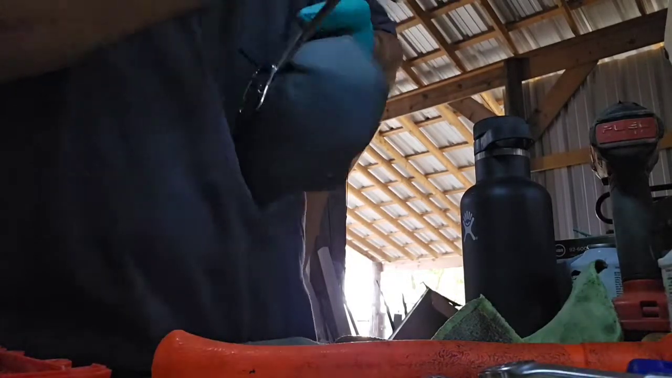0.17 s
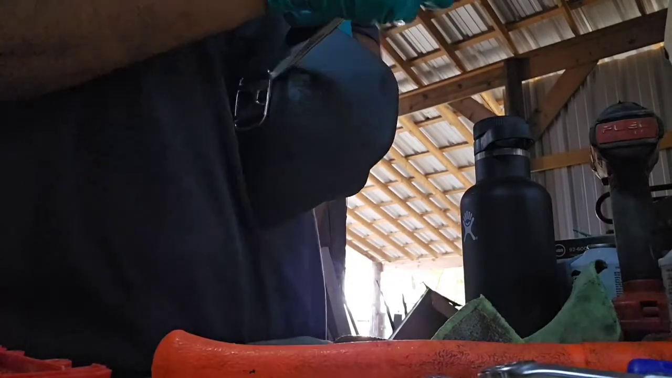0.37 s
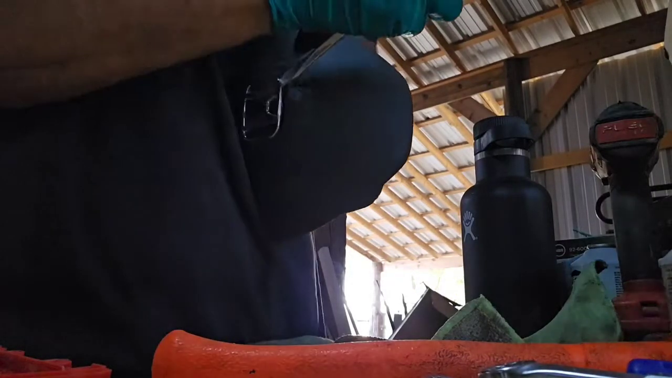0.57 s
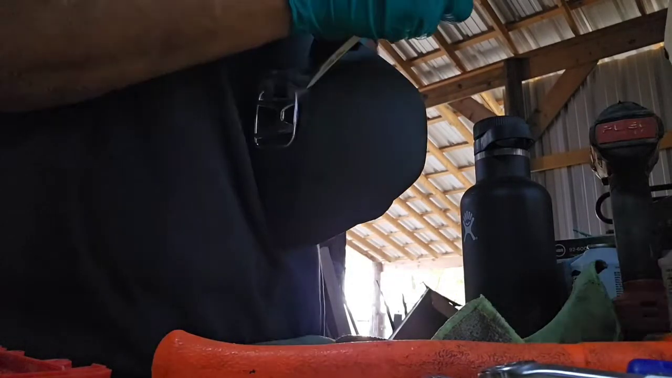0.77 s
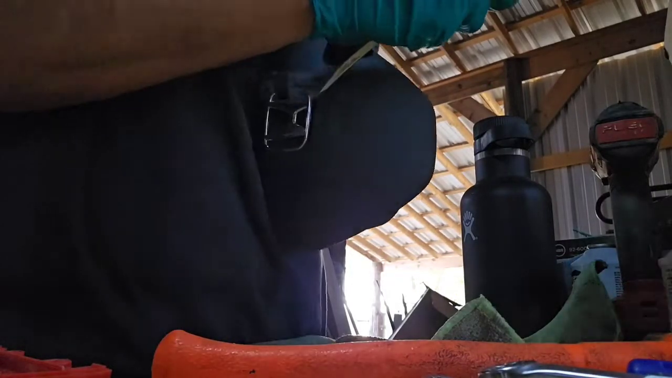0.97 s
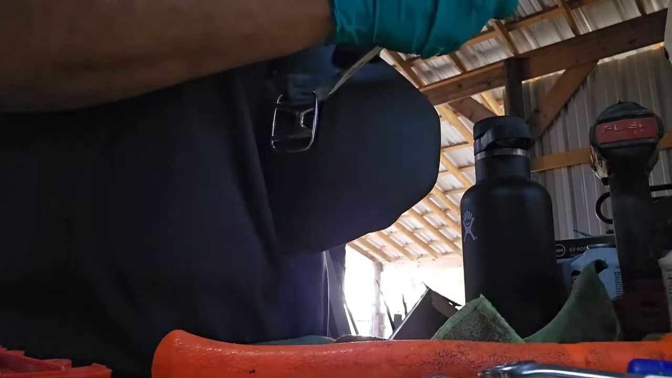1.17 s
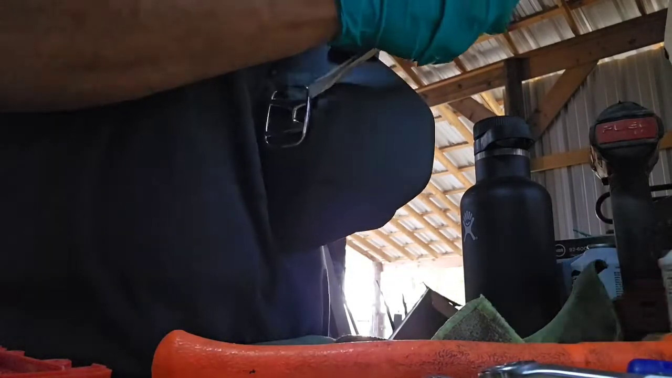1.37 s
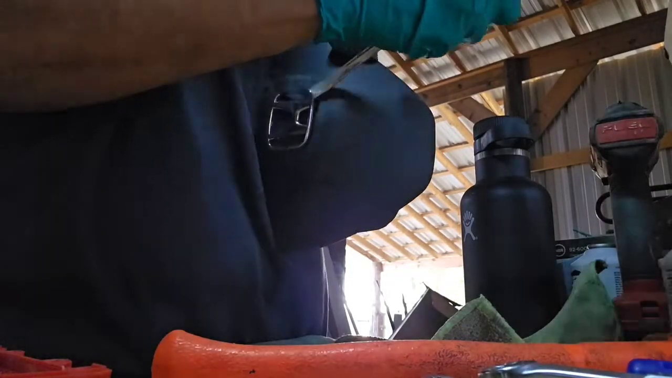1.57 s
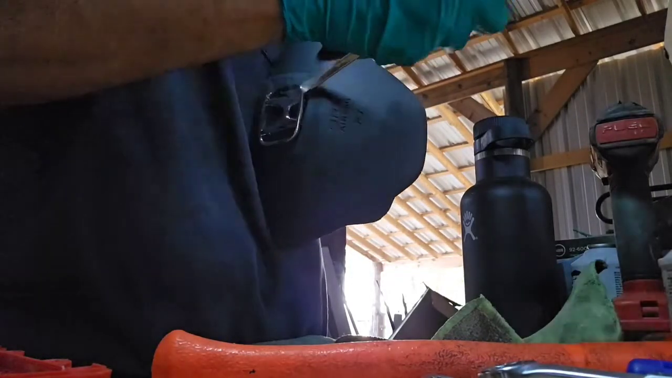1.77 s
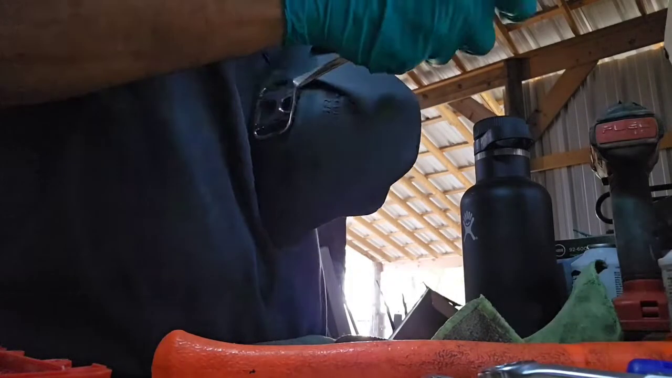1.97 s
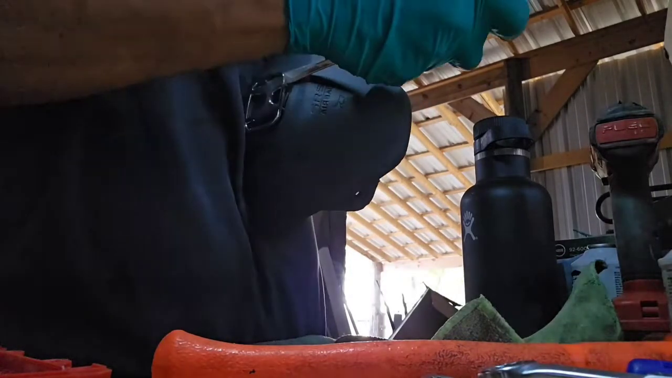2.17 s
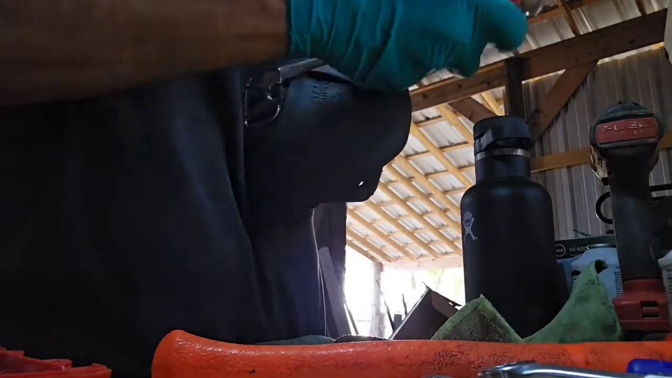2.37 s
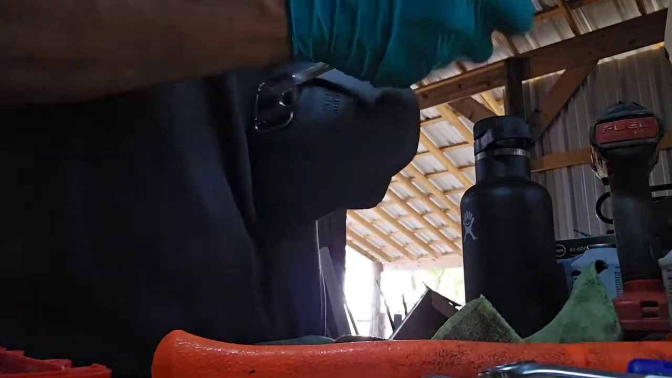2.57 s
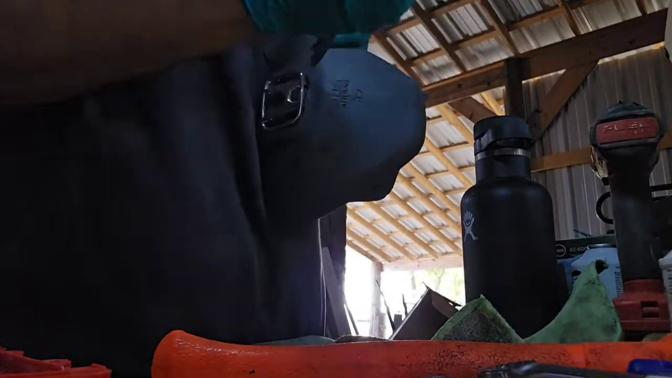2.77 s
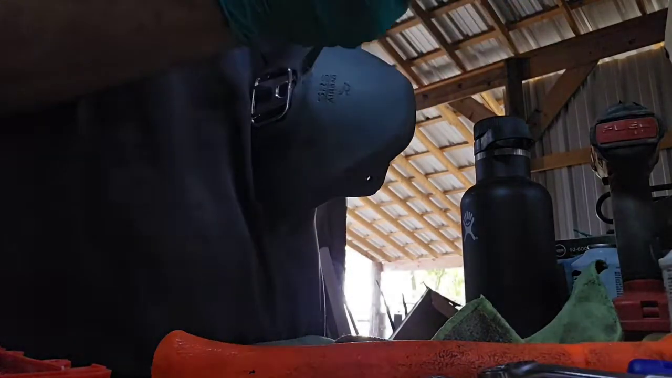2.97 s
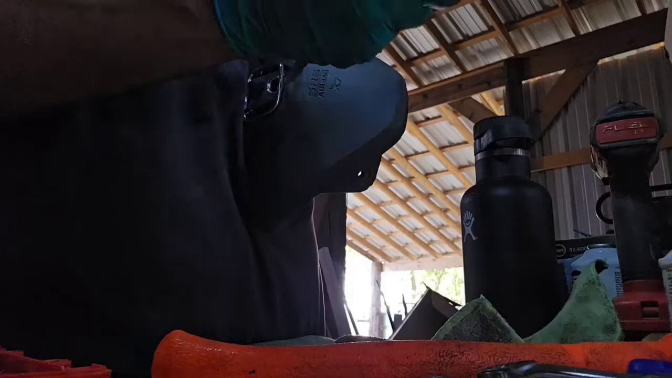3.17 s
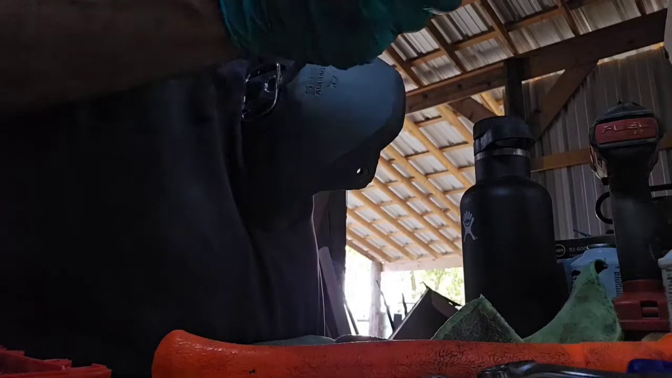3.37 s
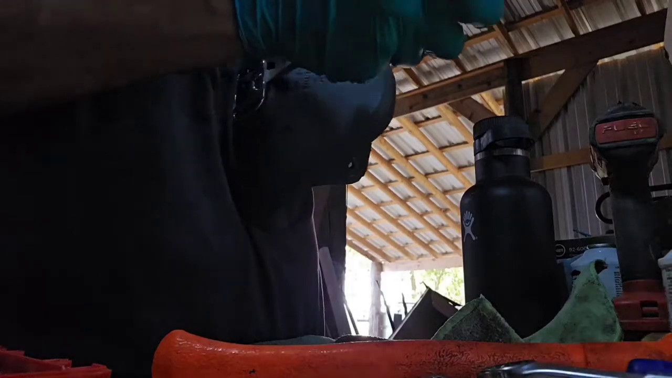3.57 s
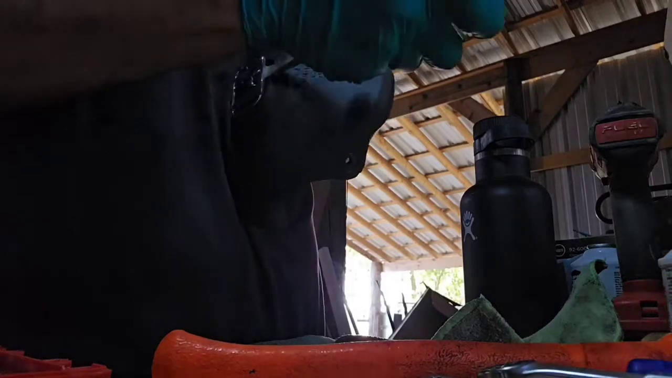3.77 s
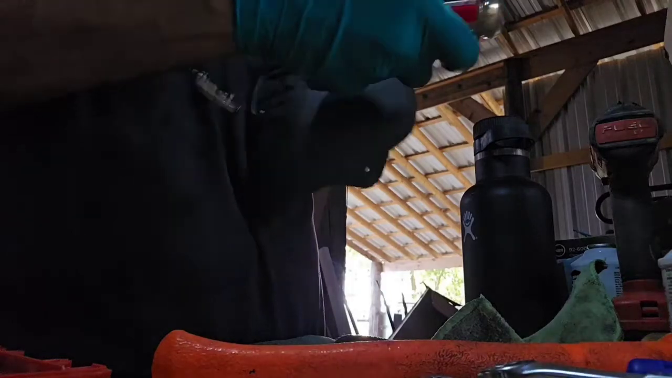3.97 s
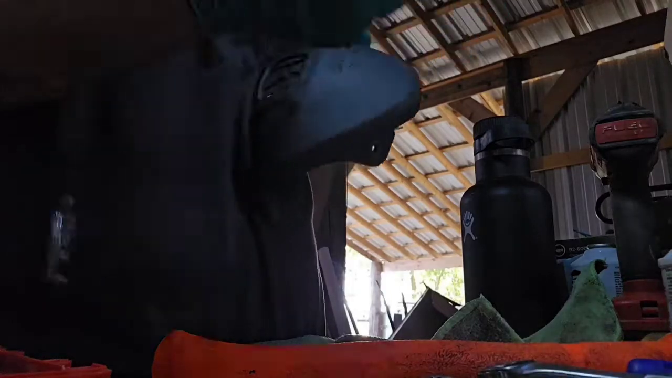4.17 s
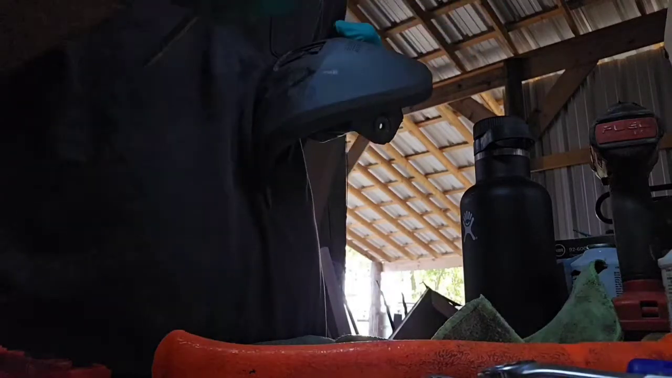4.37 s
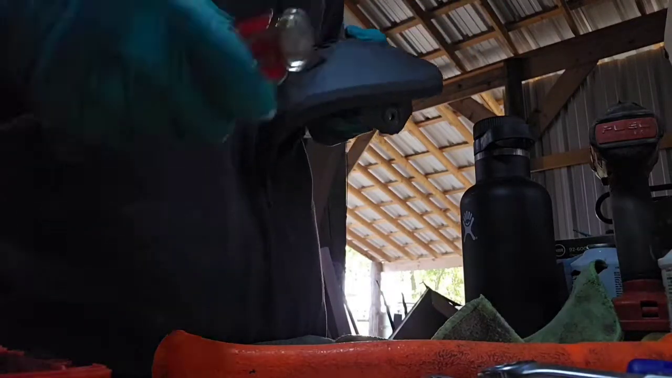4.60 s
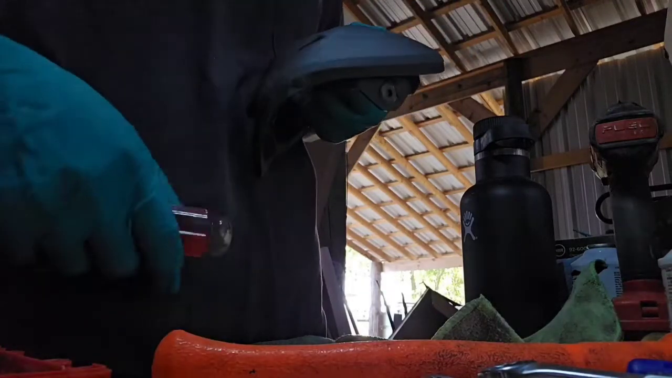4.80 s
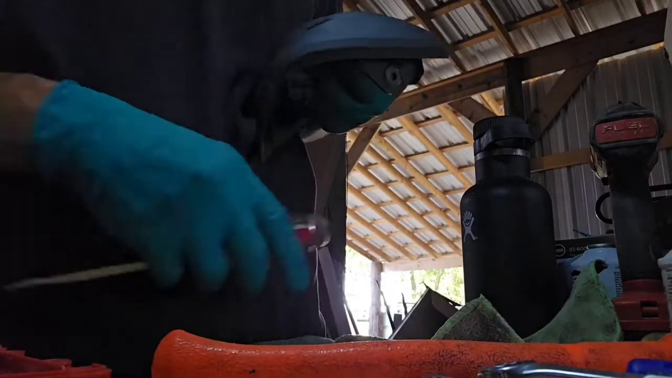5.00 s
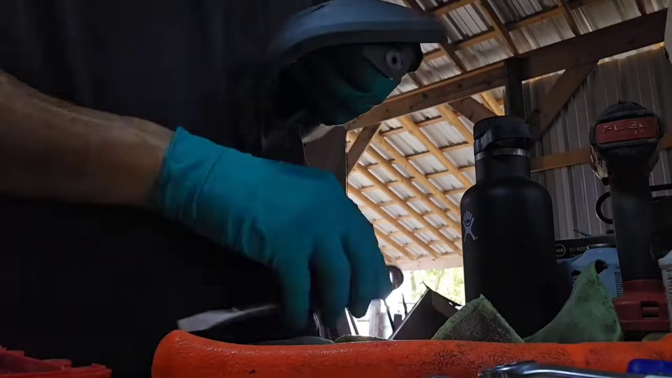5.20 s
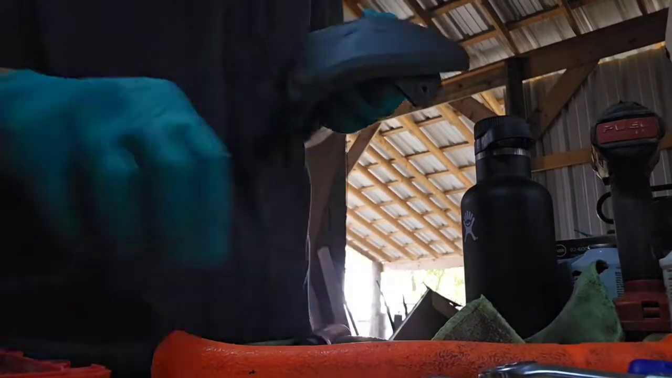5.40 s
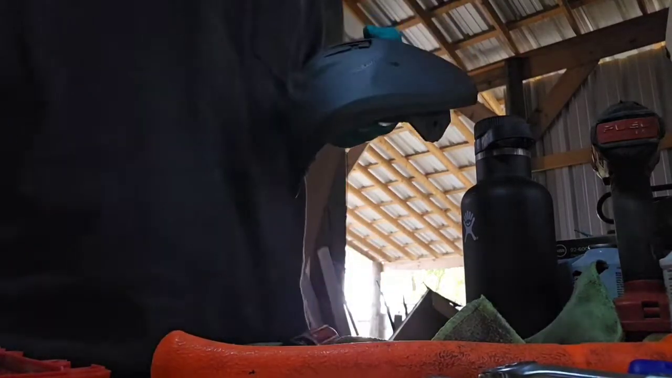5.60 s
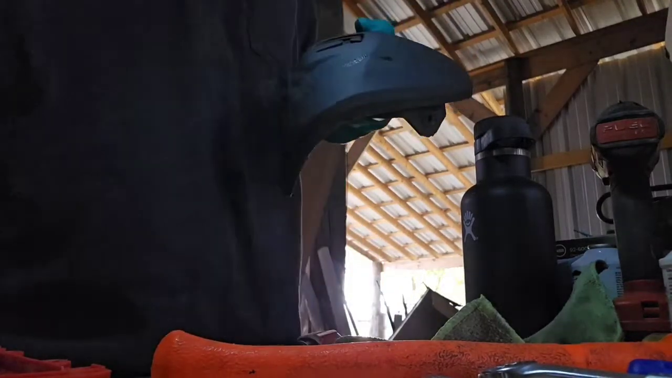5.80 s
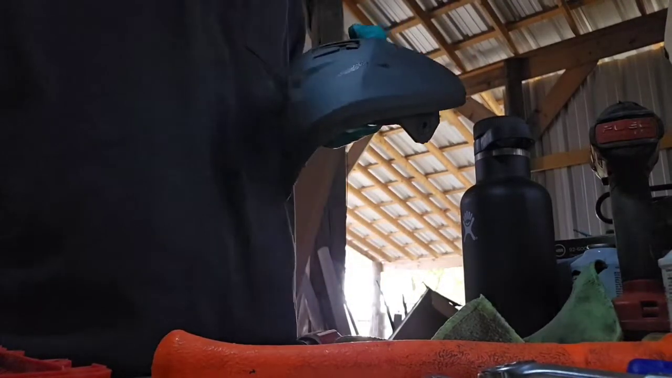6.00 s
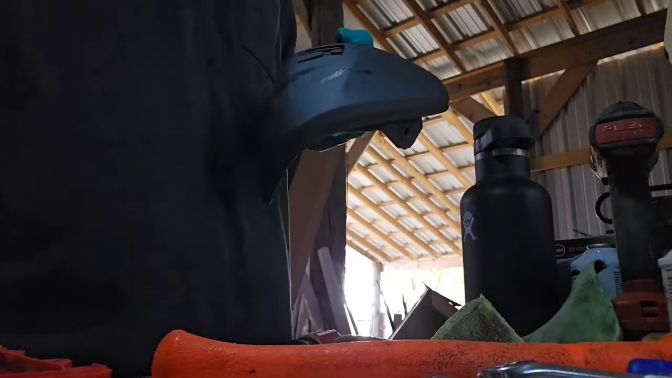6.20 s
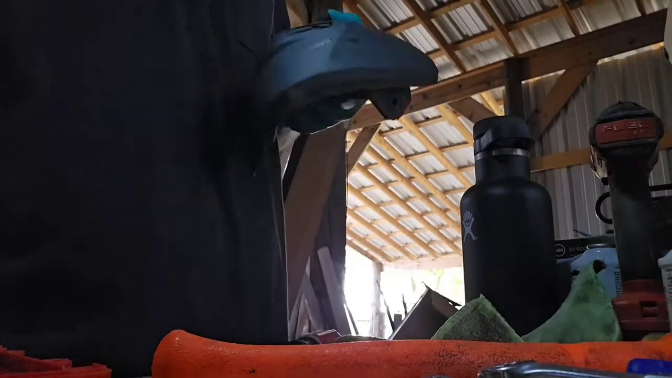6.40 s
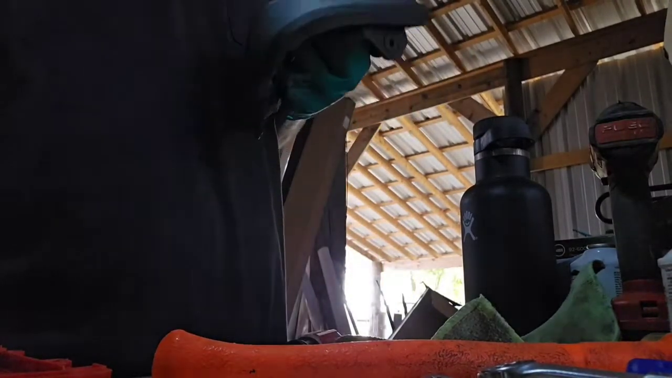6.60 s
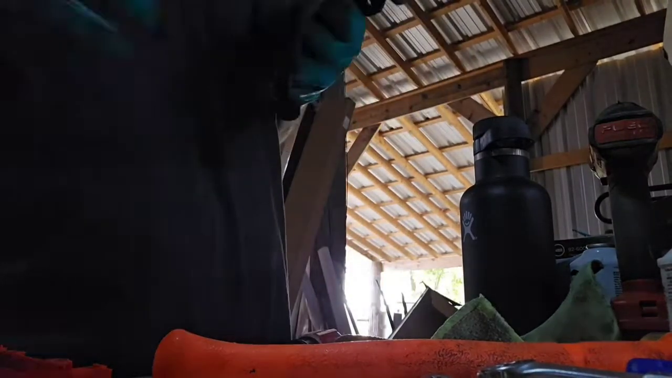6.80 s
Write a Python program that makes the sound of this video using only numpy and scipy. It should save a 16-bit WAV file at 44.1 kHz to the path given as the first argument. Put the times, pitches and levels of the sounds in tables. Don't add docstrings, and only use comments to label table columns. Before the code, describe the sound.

A stereo microphone sits on the bench, near the hands. Dry plastic clicks, short creaks and cloth rubbing come sparsely, with one strong snap around two seconds and a cluster of cracks near four. A hard little part then lands ringing on wood and chatters quieter. A heavy tool is set down with a dull double thump, followed by scratchy glove scuffs and a sharp tick. Thin cricket trills and soft outdoor rumble continue throughout.

```python
import sys
import numpy as np
from scipy import signal
from scipy.io import wavfile

SR = 44100
rng = np.random.default_rng(int(sys.argv[2]) if len(sys.argv) > 2 else 0)


def volts(x):
    e = np.asarray(x, float) / 20
    return 10 ** e


def transcribe(signal):
    frames = np.atleast_2d(signal).T
    limited = np.clip(frames, -1, 1)
    pcm = np.round(limited * 32767).astype(np.int16)
    wavfile.write(sys.argv[1], SR, pcm)


N = 302085


def rms_one(x):
    return x / np.sqrt(np.mean(x ** 2) + 1e-20)


def in_time(rows):
    s, *columns = np.transpose(rows)
    return [np.interp(np.arange(N) / SR, s, c) for c in columns]


def at_hz(points, hz):
    return np.interp(np.log(hz), np.log(np.array(points)[:, 0]), np.array(points)[:, 1])


def samples(events):
    s, *columns = np.transpose(events)
    return np.round(s * SR).astype(int), *columns


def drift(rate):
    r = np.exp(-2 * np.pi * rate * 40 / SR)
    white = rng.standard_normal(N // 40 + 2002)
    slow = signal.lfilter([1], [1, -2 * r, r * r], white)[2000:]
    return np.interp(np.arange(N) / 40, np.arange(len(slow)), rms_one(slow))


def ring(clicks, hz, t60, rise=0):
    r, w = volts(-60 / (t60 * SR)), 2 * np.pi * hz / SR
    out = signal.lfilter([0, np.sin(w)], [1, -2 * r * np.cos(w), r * r], clicks + 1e-18)
    if rise > 0:
        out = out - ring(clicks, hz, t60 * min(rise, 0.9))
    return out


def train(at, gains):
    return np.bincount(at, gains, N)[:N]


def ears(x, pan_db, lag):
    late = np.interp(np.arange(N) - lag, np.arange(N), x)
    return np.array([late * volts(pan_db / 2), x * volts(-pan_db / 2)])


def strike(at, level_db, tilt_db, modes, centre_hz, scatter_db, lag, beam, rise, damp=1, focus_db=0, sign=-1):
    out = 0
    chance = rng.standard_normal((len(at), len(modes)))
    aim = rng.standard_normal((len(modes), 2))
    for k, (hz, mode_db, t60) in enumerate(modes):
        octaves = np.log2(hz / centre_hz)
        gain_db = level_db + mode_db + tilt_db * octaves - focus_db * np.abs(octaves)
        gains = volts(gain_db + scatter_db * chance[:, k]) * sign ** k
        tone = ring(train(at, gains), hz, t60 * damp, rise)
        pan_db, skew = beam * min(hz / 3000, 1) * aim[k]
        out = out + ears(tone, pan_db, lag + skew)
    return out


def crack(at, level_db, t60, low_hz, alike):
    fall = signal.lfilter([1], [1, -volts(-60 / (t60 * SR))], train(at, volts(level_db)))
    fall = signal.lfilter([0.04], [1, -0.96], fall)
    high_pass = signal.butter(2, low_hz, "high", fs=SR, output="sos")
    mid, side = signal.sosfilt(high_pass, rng.standard_normal((2, N)))
    alike = np.clip(alike, 0, 1)
    return fall * (alike * mid + (1 - alike) * side * [[1], [-1]])


# (frequency [Hz], left-right likeness)
LIKENESS = [(60, 0.88), (180, 0.78), (550, 0.73), (1650, -0.41), (4970, 0.42), (15000, -1.3)]


def banded_noise(spectrum, patchy_db, speed):
    low, high = spectrum[0][0], min(spectrum[-1][0], 0.4 * SR)
    edges = np.geomspace(low, high, int(2.5 * np.log2(high / low)) + 2)
    out, together = 0, drift(speed)
    white = rng.standard_normal((2, 2, N))
    for k, band in enumerate(zip(edges, edges[1:])):
        band_pass = signal.butter(2, band, "band", fs=SR, output="sos")
        mid, side = signal.sosfilt(band_pass, white[k % 2])
        hz = np.sqrt(band[0] * band[1])
        alike = np.clip(at_hz(LIKENESS, hz), -1, 1)
        gain = volts(at_hz(spectrum, hz) + patchy_db * (together + drift(speed) / 2))
        out = out + gain * (np.sqrt(1 + alike) * mid + np.sqrt(1 - alike) * side * [[1], [-1]])
    return rms_one(out)


# (frequency [Hz], density [dB per Hz])
AIR = [(12, -62.5), (20, -22.5), (75, -7.5), (140, -27.5), (245, -21), (362, -33), (570, -27), (1190, -42),
       (2530, -46.5), (3500, -37), (4550, -52), (7700, -120)]
# (frequency [Hz], density [dB per Hz])
HISS = [(4500, -13), (6500, -11.5), (10200, -21), (11500, -21)]


def air():
    rumble = volts(-65.5) * banded_noise(AIR, patchy_db=3.06, speed=3.2)
    return rumble + volts(-87.5) * banded_noise(HISS, patchy_db=4.0, speed=2.2)


# ((pitch [Hz], wing strokes [per s], chirp length [s]), chirps (time [s], level [dB]))
CRICKETS = [
    ((4160, 58, .21), [(0.13, -74.5), (0.62, -79), (1.11, -72), (1.6, -70), (2.03, -68), (2.45, -67.5), (3.01, -80), (3.22, -81), (3.52, -76), (4.68, -83), (5.05, -76), (6.17, -71), (6.65, -81)]),
    ((4400, 54, 0.24), [(0.5, -80.5), (0.76, -68.5), (1.56, -69.5), (2.29, -73.5), (3.44, -68), (5.06, -72), (6.18, -78), (6.62, -81)]),
    ((4670, 52, 0.2), [(0.0, -68.5), (0.37, -72), (1.11, -71), (1.45, -68), (1.83, -66.5), (2.42, -64.5), (2.96, -74.5), (3.57, -72.5), (4.87, -77.5), (5.44, -71.5), (6.0, -79.5), (6.38, -67.5), (6.78, -80.5)]),
]


def crickets():
    out, t = 0, np.arange(N) / SR
    for (hz, per_s, length_s), chirps in CRICKETS:
        swell = np.full(N, volts(-84))
        for s, level_db in chirps:
            share = np.clip((t - s) / length_s, 0, 1)
            shape = np.abs(np.sin(np.pi * share ** 1.2)) ** 0.31
            swell = swell + volts(level_db + 3.0) * shape * (share < 1)
        stroke_hz = per_s * (1 + 0.31 * drift(29.0))
        stroke = 1 + 0.16 * np.sin(2 * np.pi * np.cumsum(stroke_hz) / SR)
        pitch = hz + 15 * drift(6.9)
        phase = np.array([2 * np.pi * np.cumsum(pitch + 45 * drift(50)) / SR for port in range(2)])
        note = np.sin(phase) + volts(-20) * np.sin(3 * phase)
        out = out + swell * stroke * note * volts([1.6 * drift(25), 6.3 * drift(25)])
    return out


# (time [s], hold
# [s], cloth level [dB], dull rubbing level [dB])
RUSTLE = [(0.001, 0.23, -65, -59.5), (0.333, 0.33, -87.5, -56), (0.91, 0.078, -84.5, -65),
          (1.58, 0.59, -81.5, -77), (2.176, 0.019, -70, -45.5), (2.586, 0.013, -72, -55.5),
          (3.214, 0.31, -93, -61), (4.01, 0.16, -66.5, -60), (4.403, 0.16, -61.5, -51),
          (4.624, .08, -61, -57.5), (4.712, 0.12, -75, -55.5), (5.257, .03, -68.5, -54),
          (5.366, 0.025, -72, -47), (5.757, 0.052, -63.5, -51.5), (6.045, .16, -67, -62),
          (6.447, 0.24, -74.5, -74)]


def gestures():
    rise_db_per_s, fall_db_per_s = 120.5, 87
    t = np.arange(0, N + 64, 64) / SR
    level_db = np.array([[-87], [-83.5]])
    for s, hold_s, *peak_db in RUSTLE:
        before_s = np.maximum(s - t, 0)
        after_s = np.maximum(t - s - abs(hold_s), 0)
        loss_db = rise_db_per_s * before_s + fall_db_per_s * after_s
        level_db = np.maximum(level_db, np.array(peak_db)[:, None] - loss_db)
    return [np.interp(np.arange(N) / SR, t, row) for row in level_db]


# (frequency [Hz], density [dB per Hz])
RUB = [(100, 1.5), (200, 1), (500, -4.5), (850, -2), (1050, -27.5), (1400, -10.5), (2500, -17.5),
       (4000, -27)]


def rubbing(rub_db):
    return volts(rub_db - 5.0) * banded_noise(RUB, patchy_db=4.0, speed=33)


# (frequency [Hz], density [dB per Hz])
CLOTH = [(900, -19.5), (1330, -7), (2560, -4.5), (4770, -7), (7500, -11.5), (10200, -24), (11500, -30)]


def rustle(cloth_db):
    cloth = volts(cloth_db + 3.0) * banded_noise(CLOTH, patchy_db=4.0, speed=8.3)
    on_cover = np.arange(N) < 4 * SR
    stroking = cloth * volts(0.6 * (cloth_db - cloth_db[0])) * on_cover
    hum = sum(ring(stroking, hz, 0.87 * t60) for hz, db, t60 in COVER[:4])
    high_pass = signal.butter(8, 10900, "high", fs=SR, output="sos")
    sheen = rms_one(signal.sosfilt(high_pass, rng.standard_normal((2, N))))
    sheen = (volts(cloth_db - 3.5) + volts(-85.5)) * volts(1.5 * drift(20)) * sheen
    return cloth + volts(-23.0) * hum + sheen


# (time [s], peak level [dB], bench level [dB])
DRAG = [(5.5493, -44, -68), (5.6238, -48, -63), (5.697, -47, -63), (5.7069, -37, -53.5), (5.7364, -46, -68),
        (5.7526, -46.5, -60), (5.759, -45.5, -65), (5.785, -38.5, -44), (5.7915, -32.5, -41),
        (5.8012, -33, -41), (5.811, -50, -40), (5.826, -38, -52), (5.8365, -39, -35.5), (5.847, -36.5, -39),
        (5.852, -41, -38), (5.8816, -49, -62), (5.926, -44, -46), (5.937, -41, -55), (5.943, -49, -52),
        (5.981, -49, -54.5), (6, -38, -70), (6.007, -60, -62), (6.045, -50, -59), (6.053, -46, -51.5),
        (6.1003, -46, -54), (6.107, -45.5, -61), (6.144, -49, -56), (6.1355, -66, -43), (6.192, -48.5, -71),
        (6.2472, -47, -60), (6.338, -42, -56.5), (6.348, -41.5, -58), (6.4453, -47, -79),
        (6.4654, -46.5, -78), (6.6864, -51.5, -82)]


def drag():
    at, level_db, bench_db = samples(DRAG)
    tilt_db = -3 + 0.36 * (level_db - bench_db)
    scuff_s, catches = 0.0063, 8
    delay = rng.random((len(at), catches)) * scuff_s * SR
    at = (at[:, None] + delay).astype(int).ravel()
    level_db, bench_db, tilt_db = np.repeat([level_db, bench_db, tilt_db], catches, axis=1)
    chatter = strike(at, level_db - 9.0, tilt_db, BADGE, 5800, scatter_db=4.5,
                     lag=3.45, beam=3.0, rise=0.062, damp=0.129)
    plastic = strike(at, level_db - 15.5, tilt_db, HANDLE, 4600, scatter_db=8.0,
                     lag=7.7, beam=3.2, rise=0.22, damp=1.4)
    boards = strike(at, bench_db - 10.5, 0.37, BENCH, 380, scatter_db=5.0,
                    lag=15.7, beam=1.4, rise=0.044, damp=0.99)
    return chatter + plastic + boards + crack(at, level_db - 15.5, 0.0078, low_hz=1520, alike=0.56)


# (time [s], peak level [dB])
TICK = [
    (6.123, -10.5),
]
# (frequency [Hz], level [dB], t60 [s])
TICK_MODES = [(1574, -11, 0.0071), (2540, -25, 0.014), (3180, -6.5, 0.016), (4500, -19, 0.0046),
              (7100, -21.5, 0.0029)]


def tool_tick():
    at, level_db = samples(TICK)
    body = strike(at, level_db, 0, TICK_MODES, 3000, scatter_db=-5.5, lag=4.6, beam=3.3, rise=0.142)
    return body + crack(at, [-36], 0.0089, low_hz=1500, alike=0.52)


# (time [s], peak level
# [dB], brightness [dB per octave], handle click level [dB], board pitch [Hz])
LAID = [
    (1.782, -47.5, 10, -51, 200),
    (2.167, -40, -4, -33.5, 240),
    (3.446, -35, 2, -36.5, 240),
    (3.854, -46.5, -1.5, -22.5, 240),
    (5.221, -1, 11, -29, 236),
    (5.242, -13, -6, -19, 190),
    (5.254, -27, 13, -39, 180),
    (5.361, -35, 6, -43, 240),
    (5.393, -18, 0, -24, 186),
    (5.353, -4, 6.5, -52.5, 196),
]
# (frequency [Hz], level [dB], t60 [s])
BENCH = [(100.34, -5, 0.092), (196, 1.5, 0.029), (239, -1.5, 0.062), (295, -7, 0.056), (332, -13.5, 0.082),
         (416, -19.5, 0.029), (505, -4, 0.052), (662, -6.5, 0.028), (706, -7, 0.026), (876, -10, 0.044),
         (1060, -26.5, 0.07)]
# (frequency [Hz], level [dB], t60 [s])
HANDLE = [(1310, -8, 0.021), (1900, -3, 0.014), (2340, -2, 0.018), (3050, -7.5, 0.0044),
          (4000, -7.5, 0.008), (5200, -11, 0.0052), (7660, -14, 0.0051), (10900, -27, 0.0011)]


def screwdriver():
    at, level_db, tilt_db, click_db, board_hz = samples(LAID)
    thump = -strike(at, level_db + 6.0, tilt_db, BENCH, board_hz, scatter_db=0.0,
                    lag=2.0, beam=1.5, rise=0.22, focus_db=9.5, sign=0.9)
    thump = signal.sosfilt(signal.butter(2, [75, 1100], "band", fs=SR, output="sos"), thump)
    click = strike(at, click_db + 5.0, -0.41, HANDLE, 3000, scatter_db=1.5, lag=7.2, beam=6.8, rise=0.17)
    click = (click + tool_tick()) * volts([[2.5], [-2.5]])
    return thump + click + crack(at, click_db - 20.5, 0.048, low_hz=1200, alike=1.0)


# (time [s], peak level [dB], bench level [dB], brightness [dB per octave])
BOUNCES = [(4.0477, -4, -16, 0), (4.0524, -12.5, -23.5, -1.5), (4.2737, -12, -32.5, 4),
           (4.2916, -17, -31.5, 6.5), (4.3094, -34, -40, 11.5), (4.3804, -25, -37.5, 8),
           (4.4114, -23.5, -43, 1), (4.4204, -23, -35, 3), (4.4324, -36, -45, -9.5),
           (4.4603, -23.5, -35, 9), (4.4684, -33.5, -36.5, -5), (4.5111, -38, -45, 10),
           (4.5244, -34, -43.5, -2.5), (4.5366, -40, -43.5, -1), (4.5511, -32, -44, -0.5),
           (4.5645, -29.5, -47, 6.5), (4.5744, -34, -49, 0), (4.6259, -44, -56, -6),
           (4.6344, -30, -48.5, 2.5), (4.6494, -45.5, -45, 1.5), (4.6638, -35.5, -52, -0.5),
           (4.6794, -37.5, -56, 5.5), (4.7034, -41.5, -47, -1), (4.7142, -32, -39, 1.5),
           (4.774, -44.5, -51.5, 3.5), (4.8544, -43.5, -53.5, 2)]
# (frequency [Hz], level [dB], t60 [s])
BADGE = [(1321, -7.5, 0.036), (2360, 4, 0.012), (3076, -7, 0.023), (4086, -7.5, 0.1), (4750, -6, 0.037),
         (5020, -11, 0.15), (3725, -9.5, 0.02), (6360, -13, 0.044), (7470, -4.5, 0.04), (8000, -12, 0.028),
         (8600, -16, 0.026), (11837, -9, 0.049), (11430, -9.5, 0.068), (12100, -9, 0.024),
         (10880, -13.5, 0.051), (13900, -10.5, 0.029), (14200, -16, 0.035), (14200, -11.5, .04),
         (15300, -9.5, .04), (15750, -10, .03)]


def badge():
    at, level_db, bench_db, tilt_db = samples(BOUNCES)
    clink = strike(at, level_db - 7.5, tilt_db, BADGE, 4400, scatter_db=4.5,
                   lag=7.5, beam=2.7, rise=0.11, damp=0.45)
    airborne = strike(at, 1.8 * level_db - 11.5, tilt_db, BADGE, 7860, scatter_db=2.0,
                      lag=6.5, beam=1.5, rise=0.055, damp=0.52)
    rattle = crack(at, level_db - 13, 0.011, low_hz=1775, alike=1.0)
    boards = strike(at, bench_db - 0.5, 2.2, BENCH, 560, scatter_db=5.5, lag=4.7, beam=1.5, rise=0.025)
    return clink + airborne + rattle + boards


def while_moving(spans):
    level_db = np.full(N, -140.0)
    for rows in spans:
        on = slice(round(rows[0][0] * SR), round(rows[-1][0] * SR))
        level_db[on] = in_time(rows)[0][on]
    return level_db


def uneven_train(level_db, per_s, uneven_db, size_db):
    rate = per_s * volts(uneven_db * drift(60))
    at = np.flatnonzero(np.diff(np.floor(np.cumsum(rate) / SR)))
    sizes_db = (level_db + size_db * rng.standard_normal(N))[at]
    up = level_db[at] > -120
    return at[up], sizes_db[up]


# (time [s], level [dB])
CREAKS = [
    [(0.31, -58.5), (0.365, -43)],
    [(1.455, -37.5), (1.491, -55), (1.495, -39)],
    [(1.705, -68), (1.743, -37), (1.8, -61)],
    [(2.55, -53), (2.666, -32), (2.68, -84)],
    [(3.426, -26.5), (3.447, -24.5)],
    [(3.833, -22), (3.847, -41), (3.85, -22.5)],
]


def creaks():
    at, size_db = uneven_train(while_moving(CREAKS), per_s=310, uneven_db=2.0, size_db=-1.0)
    body = strike(at, size_db + 0.5, -10.0 - 0.24 * size_db, COVER, 1200, scatter_db=4.5,
                  lag=-0.45, beam=1.9, rise=0.4)
    return body + crack(at, 0.82 * size_db - 5.5, 0.0022, low_hz=8090, alike=0.36)


# (time [s], peak level [dB], brightness [dB per octave])
SKIDS = [(0.324, -44, 4), (0.361, -29, 6.5), (0.458, -41, 2), (0.629, -53, 3), (0.697, -41.5, 11),
         (0.729, -39.5, 9), (0.734, -25, 5), (0.815, -42.5, 7), (0.917, -24, 3.5), (1.087, -28.5, 0),
         (1.21, -28, -3), (1.86, -42, 8), (2.075, -23, 4.5), (2.138, -41.5, 2.5), (2.168, -5.5, -7.5),
         (2.517, -43.5, 0), (2.525, -33, 5.5), (3.369, -38, -1), (3.381, -34.5, 6.5), (3.607, -51.5, 10.5),
         (3.763, -57.5, 5.5), (3.8515, -10.5, 6), (3.8655, -19, 5)]
# (time [s], peak level [dB], brightness [dB per octave])
SLIPS = [(1.429, -26.5, -3), (1.446, -26.5, -8), (1.46, -45, 7), (1.498, -18.5, 1), (1.715, -42, 3.5),
         (1.73, -49.5, 15.5), (1.741, -38, 7.5), (1.783, -33.5, 1.5), (2.101, -31, 2.5), (2.114, -37, 5.5),
         (2.378, -62.5, -12.5), (3, -58.5, -10), (3.182, -27.5, -3), (3.389, -29, -5), (3.4005, -29, 0.5),
         (3.4062, -29, 0.5), (3.4115, -27, 2), (3.4165, -28, -4), (3.4207, -27, -3.5), (3.4248, -27.5, -2),
         (3.4463, -11.5, 1), (3.662, -54, -9), (3.832, -26, 4), (3.797, -53, 0.5), (3.8565, -8.5, 0),
         (3.8585, -9, -2), (3.875, -37, 3)]
# (frequency [Hz], level [dB], t60 [s])
COVER = [(821, 1.5, 0.018), (1303, -2, 0.015), (1702, -4, 0.01), (2107, -3.5, 0.0063), (2674, -13.5, 0.014),
         (3026, -20, 0.019), (3670, -21.5, 0.0052), (4650, -20.5, 0.0054), (6200, -26.5, 0.0044),
         (7120, -24.5, 0.015), (1113, -5.5, 0.0095), (476, -26, 0.015), (240, -25, 0.026)]


def slips():
    at, level_db, tilt_db = samples(SKIDS + SLIPS)
    body = strike(at, level_db - 4.0, tilt_db, COVER, 1300, scatter_db=4, lag=-2.8, beam=2.04, rise=0.21)
    crack_db = np.repeat([-40.5, -59], [len(SKIDS), len(SLIPS)])
    crack_db = crack_db + 0.91 * (level_db + 29)
    return body + crack(at, crack_db + 9.5, 0.0044, low_hz=3446, alike=0.46)


def shed(x):
    t = np.arange(SR) / SR
    white = rng.standard_normal((2, 2, SR))
    early = white[0] * volts(-35.5 - 60 * t / 0.098) * (t > 0.012) * (t < 0.042)
    dull = signal.lfilter([0.2], [1, -0.85], white[1])
    tail = dull * volts(-53.0 - 60 * t / 0.59) * (t > 0.02)
    return signal.fftconvolve(x.mean(axis=0, keepdims=True), early + tail, axes=1)[:, :N]


def scene():
    cloth_db, rub_db = gestures()
    background = air() + crickets() + rubbing(rub_db) + rustle(cloth_db)
    work = drag() + screwdriver() + badge() + creaks() + slips()
    return background + work + shed(work)


def top_cut(x):
    return signal.sosfilt(signal.butter(12, 16970, fs=SR, output="sos"), x)


def record(dry):
    x = 1.184 * np.tanh(dry / 1.201)
    x = signal.sosfilt(signal.cheby2(12, 24, 16150, fs=SR, output="sos"), x)
    ahead = rng.standard_normal((1, 600)) * volts(-32.0 - 60 * np.arange(600) / SR / 0.026)
    x = x + signal.fftconvolve(x[:, ::-1], ahead, axes=1)[:, N - 1::-1]
    return top_cut(x)


dry = scene()
out = record(dry)
transcribe(out)
```